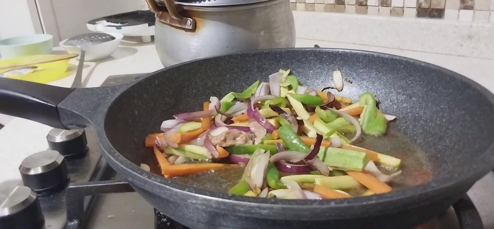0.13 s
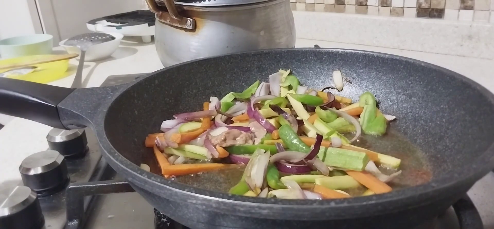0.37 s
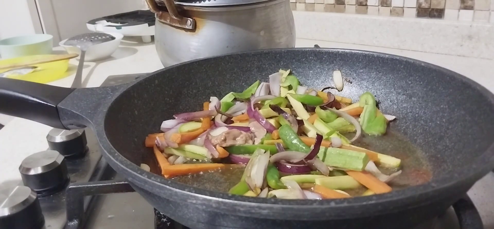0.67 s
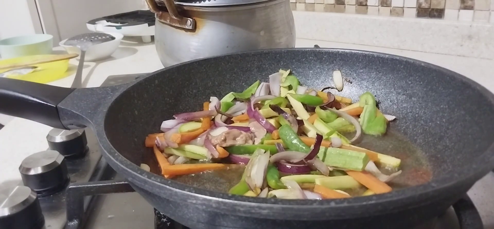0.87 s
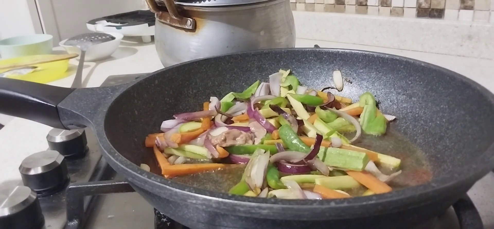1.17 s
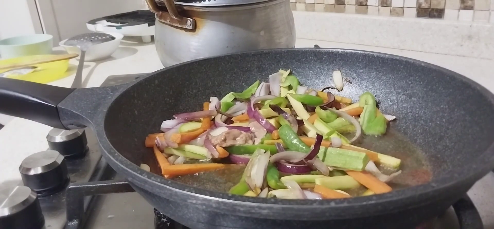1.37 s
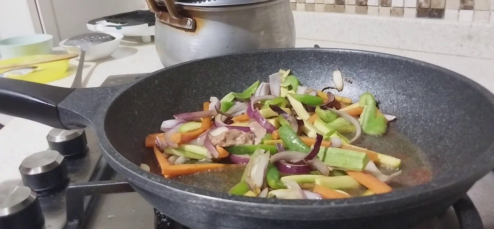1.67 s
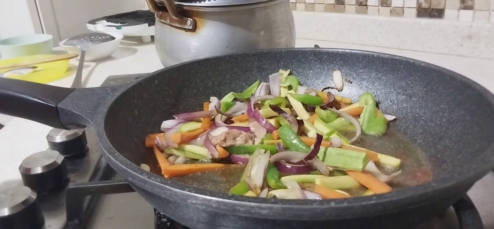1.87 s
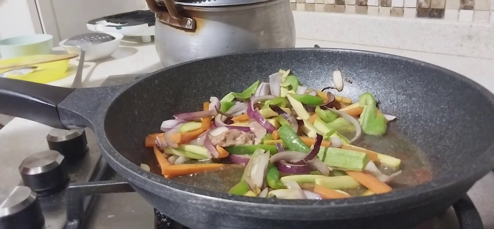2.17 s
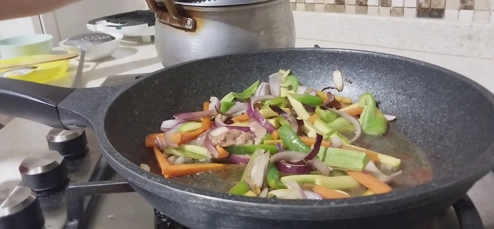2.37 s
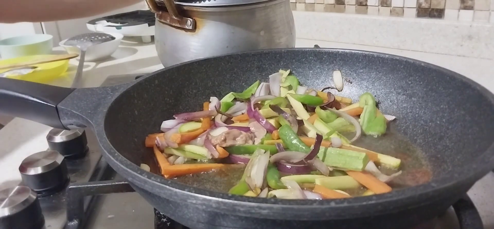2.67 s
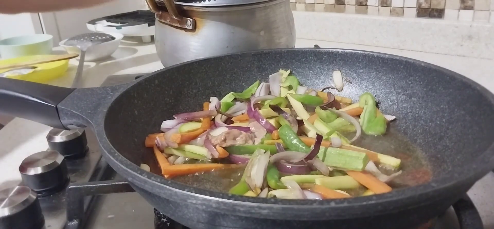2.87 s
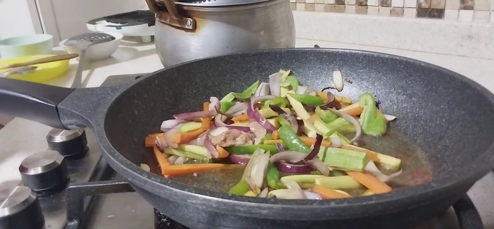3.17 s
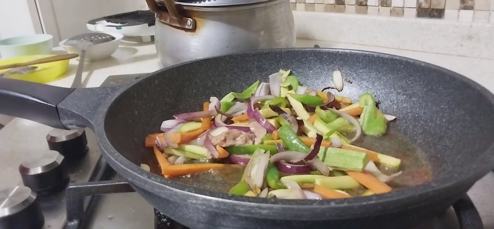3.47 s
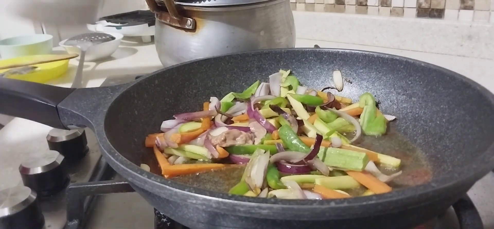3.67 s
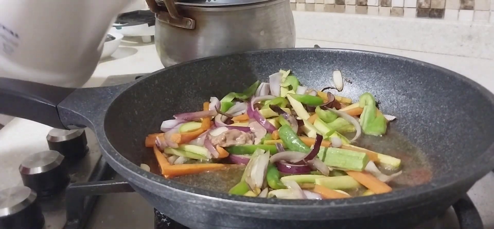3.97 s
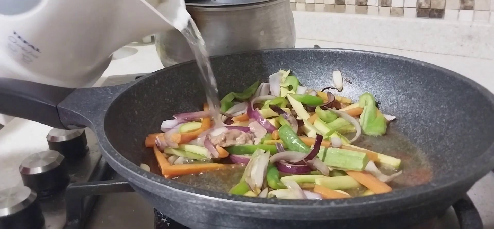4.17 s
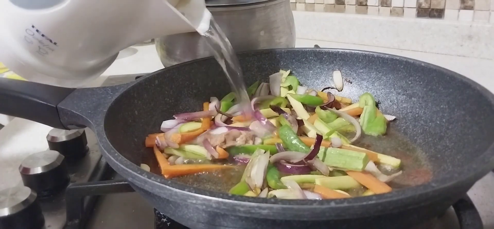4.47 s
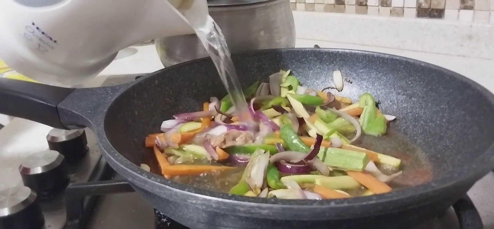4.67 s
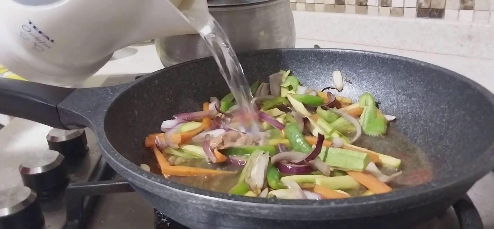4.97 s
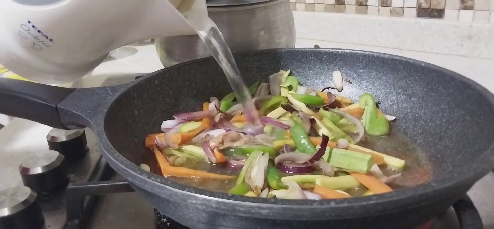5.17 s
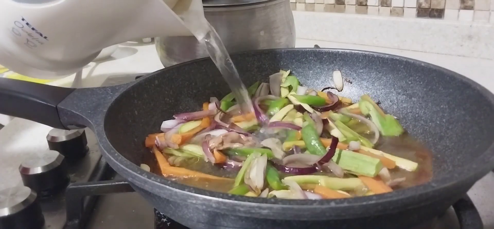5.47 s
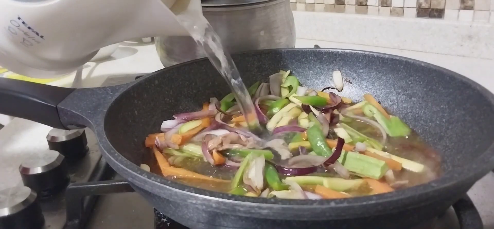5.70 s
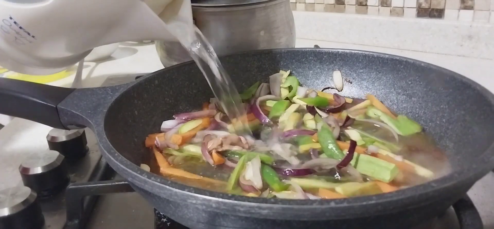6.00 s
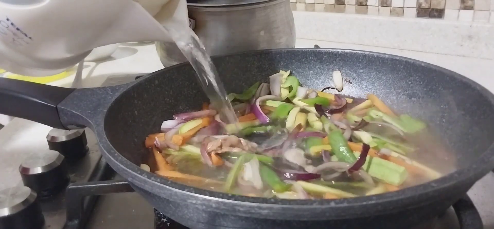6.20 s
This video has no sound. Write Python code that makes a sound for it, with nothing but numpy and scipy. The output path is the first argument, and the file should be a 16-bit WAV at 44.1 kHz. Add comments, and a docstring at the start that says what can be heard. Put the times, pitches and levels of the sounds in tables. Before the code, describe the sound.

Crackling frying over a low gas flame, several heavy rattling thumps, a finger rub on the microphone, then a duller sizzle rising into bubbling.

```python
"""Water poured into a frying pan

Vegetables sizzle over a gas flame near a hand-held camera in a small kitchen: bursting bubbles over hissing steam.
Five dull knocks ring the counter's modes and rattle what lies on it; a utensil clacks, bounces and slides; oil spits.
Water is poured in and its longer-ringing bubbles come up; a finger judders over the left microphone.
The grip shifts: the sizzle drops abruptly, the left treble opens and the right one dulls.
Then the pan boils up, with a faint whistle of steam."""
import sys
import numpy as np
from scipy import signal
from scipy.fft import rfft, irfft
from scipy.io import wavfile
from scipy.ndimage import map_coordinates

SR = 44100
rng = np.random.default_rng(int(sys.argv[2]) if len(sys.argv) > 2 else 0)


def write(x):
    x = np.atleast_2d(x).T
    wavfile.write(sys.argv[1], SR, np.round(np.clip(x, -1, 1) * 32767).astype(np.int16))


N = 279594
TIME = np.arange(N) / SR  # seconds

# Gas flame over time. Each row: time in seconds, level in dB.
FLAME = [(0, -38.5), (1.1, -40), (3.1, -46.5), (4.3, -52.5), (4.85, -54), (5.25, -65), (6.34, -58.5)]
# Spectrum of the flame's roar. Each row: frequency in Hz, density in dB per Hz.
ROAR = [(25, -22), (55, -6.5), (100, 4.5), (160, -6), (245, 5), (370, -19.5), (520, -5), (900, -18),
        (3000, -50)]
# The hollow of the pan: it rings at one pitch when open, at another with the jug held over it.
HOLLOW_START_DB, HOLLOW_DB_PER_FLAME_DB = -41, 0.37
HOLLOW_OPEN_HZ, HOLLOW_COVERED_HZ = 603, 714
JUG_OVER_S, JUG_MOVE_S = 3.73, 0.23

# Skin that sticks and slips. Each row: start in seconds, length in seconds, level in dB, judder in Hz,
# share by which the pitch sags at the end.
SLIPS = [(4.519, 0.058, -18, 239, 0.064), (4.572, 0.078, -13, 230, 0.075), (4.576, 0.17, -17, 140, 0.017),
         (4.638, 0.065, -35, 637, 0), (4.73, 0.038, -15, 232, 0.08), (4.735, 0.082, -24, 139.3, 0),
         (4.778, 0.048, -35, 635, 0.32), (4.798, 0.024, -15.5, 233, 0.08)]
SLIP_OVERTONE, SLIP_OVERTONE_DB = 1.6, -20.5  # the skin's second resonance: ratio to the first, level against it
# Spectrum of the finger's scuff. Each row: frequency in Hz, density in dB per Hz.
SCUFF = [(30, -18), (100, 3.0), (350, -10.5), (480, -25), (640, -18), (900, -34), (6000, -43)]
RUB_START_S, RUB_RISE_S = 4.50, 0.043
GRIP_SHIFT_S = 4.82  # the rubbing stops as the grip shifts

# Soft bumps on the camera body. Each row: start in seconds, level in dB, pitch in Hz, t60 in seconds.
BUMPS = [(0.108, -21, 194, 0.065), (0.474, -21, 225, 0.05), (0.576, -27, 190, 0.089),
         (2.975, -32.5, 106, 0.43), (4.806, -14, 125, 0.042), (5.535, -26.5, 64, 0.46),
         (5.63, -32, 80, 0.17), (5.74, -45, 60, .3)]
# Spectrum of the diffuse tail after a bump. Each row: frequency in Hz, density in dB per Hz.
BUMP_TAIL = [(30, -3), (70, -3.0), (230, -3), (400, -14), (3000, -26)]

# A utensil set down and bouncing. Each row: start in seconds, level in dB.
CLUNKS = [(2.860, -15.5), (2.877, -27), (2.933, -27)]
# Modes of the utensil. Each row: frequency in Hz, level in dB, t60 in seconds.
UTENSIL = [(544, -3.5, 0.072), (610, -1, 0.1), (787, -9.5, .1), (938, -12, 0.093), (1476, -9.5, 0.063),
           (1970, -10, 0.06), (2590, -14, .05)]
# Spectrum of the clack's echo. Each row: frequency in Hz, density in dB per Hz.
CLACK_ECHO = [(250, -26), (480, 0), (600, -1.0), (750, -12), (1500, -9), (5000, -19)]
SLIDE_S, SLIDE_LENGTH_S, SLIDE_DB, SLIDE_HZ = 3, 0.23, -37, 545

# Loud spits and ticks of oil. Each row: start in seconds, level in dB.
TICKS = [(2.018, -23.5), (2.858, -27.5), (3.757, -33)]
# Spectrum of a spit. Each row: frequency in Hz, density in dB per Hz.
SPIT = [(400, -10), (1100, 1), (5000, 3), (10000, -1), (15000, -14)]
SNAP_S, SNAP_DB = 0.0007, 12  # the burst itself: decay time, level over its reflections

# Knocks on the counter, the last one a tumble of four contacts. Each row: start in seconds, force in dB,
# thud against it in dB, rattle against it in dB, factor on the decay times.
KNOCKS = [(1.2083, 2, -2, -0.2, 0.99), (1.536, 0.5, 1.5, -2.5, 1.2), (1.800, -3, 2, -1.5, 1.17),
          (2.138, -1.5, 2.5, -4, 1.12), (3.147, -2.5, -6, 6.5, 1.4), (3.165, 0.5, -5, 0.5, 1.04),
          (3.1814, 1, -10, -3, 0.98), (3.2004, -7.5, -1, -1.5, 0.9)]
# The panel under the blow. Each row: frequency in Hz, level in dB, t60 in seconds.
THUD = [(44.6, -17, 0.43), (54.1, -11.5, 0.27), (83.7, -4.5, 0.19), (107.3, 1, 0.22)]
# Modes of counter and cupboard. Each row: frequency in Hz, level in dB, t60 in seconds before the knock's factor.
COUNTER = [(98.5, 0, 0.35), (152, -1.5, 0.19), (184.2, -8, 0.36), (219.5, -9, 0.27), (242.8, -10.5, 0.78),
           (268.2, -4.5, 0.4), (302, -7.5, 0.29), (327, -16, 0.47), (342, -9.5, 0.38), (460, -15, 0.31),
           (493, -11, 0.17), (556, -22, 0.24), (713, -21, 0.35)]
MODE_SPREAD_DB = 1.1  # each blow lands elsewhere and favours other modes
# The room's answer to a knock. Each row: frequency in Hz, density in dB per Hz.
BOOM = [(25, -30), (50, 2.5), (105, -4.5), (165, -1.5), (260, 2.5), (340, -4), (400, -16.5), (490, -7),
        (560, -29), (1500, -48)]
THUD_BELOW_HZ = 130  # a heavier thud also deepens the room's answer below this
# Loose things on the counter. Each row: frequency in Hz, density in dB per Hz.
RATTLE = [(150, -13), (450, 7), (800, 1), (1100, 1), (1500, -2.5), (2200, -3.5), (4400, -2), (6500, -13.5),
          (9000, -13.5), (15000, -18)]
CHATTER_PER_S, CHATTER_FADE_S = 450, 0.039  # hard contacts per second, decay time
# Decay of the kitchen's reflections. Each row: frequency in Hz, t60 in seconds before each sound's own factor.
KITCHEN = [(60, 0.67), (250, 0.55), (600, 0.63), (2000, 0.45), (12000, 0.12)]

# Steam that sings through a gap in the vegetables; its pitch sinks as the water rises.
SINGING_S, SINGING_LENGTH_S, SINGING_DB = 5.98, 0.3, -42
SINGING_START_HZ, SINGING_END_HZ, SINGING_WIDTH_HZ = 2950, 2680, 150

# Frying, used until the drop. Each row: time in seconds, sizzle in dB before a fixed lift.
HEAT = [(0.0, -33), (0.97, -33), (1.29, -38), (2.12, -39.5), (3.1, -38), (3.31, -41.5), (3.6, -40.5),
        (4.4, -41.5), (4.7, -40)]
HEAT_LIFT_DB = 2
# Spectrum of the bursting bubbles. Each row: frequency in Hz, density in dB per Hz.
SIZZLE = [(100, -29), (350, -5.5), (800, -2.5), (1300, -1), (1900, -0.5), (2400, -2), (3200, -0.5),
          (4700, 2.5), (6200, 0), (10000, -2.5), (12200, -4.5), (15500, -7)]
# Spectrum of the ringing water bubbles. Each row: frequency in Hz, density in dB per Hz.
BOIL = [(1400, -22), (1900, 1.5), (2200, -8.5), (2700, -2.5), (3400, -11), (4400, 3), (5600, 1.5),
        (6600, 2.5)]
# Flare-ups as juice or water meets hot metal. Each row: peak time in seconds, dB above the sizzle.
FLARES = [(0.90, 1.5), (1.10, 2), (4.522, 4.5), (4.70, 3.5), (4.78, 1), (5.40, 1.5), (5.57, 2), (5.70, 0.5),
          (6.07, 1), (6.145, 1.5)]
FLARE_RISE_S, FLARE_FADE_S = 0.019, 0.04
FLARE_FIZZ = 0.35  # flares are bright: extra dB of finest bubbles per dB of flare
POUR_S, WET_RISE_S = 4.33, 0.29  # the water lands, its bubbles come in
DROP_S, DROP_LENGTH_S = 4.81, 0.014  # the sizzle drops abruptly as the grip shifts
BOIL_START_S, BOIL_RISE_S = 5.29, 1
PLIPS_DB = -5.5  # a few large bubbles against the small ones

# Microphone colour. Each row: frequency in Hz, left in dB, right in dB, left in dB after the grip shifts,
# right in dB after it.
PORTS = [(386, 0.5, 1, -1, -2.5), (1840, 0, -1, 1.5, 1), (6160, -3.5, -0.5, -1.5, -0.5),
         (6800, -6.5, 2, -3, -2), (7600, -32, 3.5, -12, -5.5), (8040, -42, -3, -35, -14),
         (8760, -27, -6, -13, -10.5), (10350, -20.5, 1, -7.5, -3), (12150, -9.5, 3, 1, 3.5),
         (15500, -9, 0.5, 1, 3.5)]
# Likeness of the two microphones. Each row: frequency in Hz, left-right coherence from 0 to 1.
LIKENESS = [(50, 0.83), (120, 0.53), (250, 0.62), (500, 0.74), (1000, 0)]
EDGE_HZ = 15650  # upper band limit


def amp(db):
    """Decibels to gain."""
    return 10 ** (np.asarray(db) / 20)


def unit(x):
    """Scales to rms 1."""
    return x / np.sqrt(np.mean(x ** 2) + 1e-20)


def read(points, hz):
    """Reads a table along log frequency."""
    f, value = np.transpose(points)
    return np.interp(np.log(hz + 1), np.log(f + 1), value)


def follow(rows):
    """One curve from (seconds, value) rows, joined by straight lines."""
    s, value = np.transpose(rows)
    return np.interp(TIME, s, value)


def ramp(start_s, length_s):
    """Goes steadily from 0 to 1, then stays."""
    return np.clip((TIME - start_s) / length_s, 0, 1)


def arch(start_s, length_s):
    """Swells from 0 to 1 and back."""
    return np.sin(np.pi * ramp(start_s, length_s))


def glide(start_s, length_s, first, last):
    """Moves steadily from one value to another."""
    return np.interp(ramp(start_s, length_s), [0, 1], [first, last])


def stages(frying, dropped, boiling):
    """A value through three stages: the pan fries, drops abruptly as the grip shifts, then comes to the boil."""
    drop = (dropped - frying) * ramp(DROP_S, DROP_LENGTH_S)
    boil = (boiling - dropped) * ramp(BOIL_START_S, BOIL_RISE_S)
    return frying + drop + boil


def add(mix, s, sound):
    """Mixes a sound in at time s."""
    part = mix[:, round(s * SR):][:, :sound.shape[-1]]
    part += sound[..., :part.shape[1]]


def colour(x, spectrum):
    """Filters by a (Hz, dB) table."""
    size = x.shape[-1]
    gain = amp(read(spectrum, np.fft.rfftfreq(size, 1 / SR)))
    return irfft(rfft(x) * gain, size)


def air(size):
    """White noise at two close microphones: alike in the bass, unrelated in the treble."""
    a, b = rfft(rng.standard_normal((2, size)))
    same = np.clip(read(LIKENESS, np.fft.rfftfreq(size, 1 / SR)), 0, 1)
    return irfft(np.array([a, same * a + np.sqrt(1 - same ** 2) * b]), size)


def wander(rate):
    """Smooth random drift of rms 1 with rate new values a second."""
    values = rng.standard_normal(4096)
    return unit(map_coordinates(values, [TIME * rate], order=2, mode="wrap"))


def resonate(x, hz, width):
    """A resonance that follows the curve hz: shift it down to 0 Hz, smooth, shift back."""
    turn = np.exp(2j * np.pi * np.cumsum(hz) / SR)
    r = np.exp(-np.pi * width / SR)
    return (turn * signal.lfilter([(1 - r) ** 2], [1, -2 * r, r * r], x / turn)).real


def ring(modes, stretch=1):
    """Dying sines of a struck object."""
    t = TIME[:SR]
    return sum(amp(db - 60 * t / (t60 * stretch)) * np.sin(2 * np.pi * hz * t) for hz, db, t60 in modes)


def onset(rise_s):
    """A soft start: 0 to 1 with the given time constant."""
    return 1 - np.exp(-TIME[:SR] / rise_s)


def tail(spectrum, stretch, rise_s):
    """Dense kitchen reflections that build up and die, the treble first."""
    hz, t, z = signal.stft(unit(colour(air(SR), spectrum)), SR, nperseg=512)
    t60 = stretch * read(KITCHEN, hz)[:, None]
    decaying = signal.istft(z * amp(-60 * t / t60), SR)[1][:, :SR]
    return decaying * onset(rise_s)


def crackle(per_s, spread_db, pop_s, wet, top_hz):
    """Tiny bubbles burst, each a brief ring at its own pitch, size and side; the walls smear them."""
    t = np.arange(0, 4 * pop_s, 1 / SR)
    when, size, side, lag, pitch, sign = rng.random((int(per_s * TIME[-1]), 6)).T[..., None]
    # many small bursts, few large ones, of either polarity
    height = amp(spread_db * np.minimum(-np.log(1 - size), 5)) * np.sign(sign - .5)
    hz = 900 + pitch * (top_hz - 900)
    rings = height * np.exp(-t / pop_s) * np.sin(2 * np.pi * hz * t)
    at = (when * N).astype(int) + np.arange(len(t))
    # the left arrives up to 6 samples before or after the right
    ports = [(at + (lag * 12).astype(int), side), (at + 6, 1 - side)]
    out = np.array([np.bincount(i.ravel(), (rings * np.sqrt(share)).ravel(), N)[:N] for i, share in ports])
    walls = tail([(100, 0), (15000, 0)], stretch=0.26, rise_s=0.0031)
    smeared = signal.oaconvolve(out, walls, axes=1)[:, :N]
    return unit(unit(out) + wet * unit(smeared))


def stove():
    """The flame is low fluttering noise; the hollow of the pan is a noise resonance that partly follows its level."""
    level_db = follow(FLAME)
    flutter_db = 2 * wander(18)
    left_over_right_db = glide(GRIP_SHIFT_S, .01, 10, -18.5)
    sides_db = np.array([left_over_right_db, -left_over_right_db]) / 2
    flame = unit(colour(air(N), ROAR)) * amp(level_db + sides_db + flutter_db)

    hz = glide(JUG_OVER_S, JUG_MOVE_S, HOLLOW_OPEN_HZ, HOLLOW_COVERED_HZ)
    flame_change_db = level_db - level_db[0]
    hollow_db = HOLLOW_START_DB + HOLLOW_DB_PER_FLAME_DB * flame_change_db + .5 * flutter_db
    hollow = unit(resonate(air(N), hz, width=266)) * amp(hollow_db) * amp([[-2], [2.5]])
    return flame + hollow


def finger_rub():
    """Skin scuffs across the left port as low noise; each stick-slip is a juddering swell of unsteady pitch."""
    scuff = unit(colour(rng.standard_normal((2, N)), SCUFF))
    sliding = ramp(RUB_START_S, RUB_RISE_S) * (1 - ramp(GRIP_SHIFT_S, 0.0055))
    out = scuff * sliding * amp([[-27], [-36]])
    unsteady = 1 + 0.04 * wander(90)
    for s, length, db, hz, sag in SLIPS:
        progress = np.arange(0, 1, 1 / (length * SR))
        swell = np.sin(np.pi * progress)
        pitch = hz * (1 - sag * progress ** 3) * unsteady[round(s * SR):][:len(swell)]
        phase = 2 * np.pi * np.cumsum(pitch) / SR
        judder = np.sin(phase) + amp(SLIP_OVERTONE_DB) * np.sin(SLIP_OVERTONE * phase)
        add(out, s, amp(db) * swell * judder * amp([[0], [-22]]))
    return out


def body_bumps():
    """Soft bumps on the camera body: one low dying sine each, with a diffuse tail."""
    out = np.zeros((2, N))
    for s, db, hz, t60 in BUMPS:
        push = ring([(hz, 0, t60)]) * onset(.006)
        diffuse = amp(-4.0) * tail(BUMP_TAIL, stretch=t60 * 2, rise_s=0.0021)
        add(out, s, amp(db) * (push + diffuse))
    return out


def utensil():
    """A utensil clacks and bounces, ringing its modes into the room, then slides as narrow noise."""
    out = np.zeros((2, N))
    note = ring(UTENSIL) * onset(0.0017) * amp([[-1], [2]])
    for s, db in CLUNKS:
        echo = tail(CLACK_ECHO, stretch=1.0, rise_s=0.0023)
        add(out, s, amp(db) * (note + amp(-11.0) * echo))
    slide = unit(resonate(air(N), np.full(N, SLIDE_HZ), width=83))
    return out + slide * arch(SLIDE_S, SLIDE_LENGTH_S) * amp(SLIDE_DB)


def oil_spits():
    """Large drops of oil spit with a sharp snap of noise that the walls throw back."""
    out = np.zeros((2, N))
    for s, db in TICKS:
        snap = unit(colour(air(SR), SPIT)) * np.exp(-TIME[:SR] / SNAP_S) * amp(SNAP_DB)
        walls = tail(SPIT, stretch=0.37, rise_s=0.00077)
        add(out, s, amp(db) * (snap + walls) * amp([[-1.5], [1.5]]))
    return out


def chatter():
    """Loose things jump and land again and again, each contact a hard tick."""
    contacts = (rng.random((2, SR)) < CHATTER_PER_S / SR) * rng.uniform(-0.85, 1, (2, SR))
    return unit(colour(contacts * np.exp(-TIME[:SR] / CHATTER_FADE_S), RATTLE))


def knocks():
    """Each blow thuds, swings the counter's modes, fills the room with a boom and rattles what lies on top."""
    out = np.zeros((2, N))
    swing = onset(0.0062)  # heavy panels take a moment to get moving
    for s, force_db, thud_db, rattle_db, stretch in KNOCKS:
        modes = [(hz, db + MODE_SPREAD_DB * rng.standard_normal(), t60) for hz, db, t60 in COUNTER]
        thud = ring(THUD) * amp(thud_db - 10.5)
        counter = ring(modes, stretch) * amp(-13.5)
        answer = [(hz, db + thud_db * (hz < THUD_BELOW_HZ)) for hz, db in BOOM]
        boom = tail(answer, stretch * 0.9, rise_s=0.0047) * amp(-17.0)
        rattle = tail(RATTLE, stretch, rise_s=0.003) * amp(-22.5) + chatter() * amp(-45.5)
        blow = swing * (thud + counter) + boom + rattle * amp(rattle_db)
        add(out, s, amp(force_db) * blow)
    return out * amp([[-1.3], [1.2]])


def steam():
    """A faint, rippling whistle as the water comes to the boil: noise through a narrow, sinking resonance."""
    hz = glide(SINGING_S, SINGING_LENGTH_S, SINGING_START_HZ, SINGING_END_HZ)
    whistle = unit(resonate(air(N), hz, SINGING_WIDTH_HZ))
    return whistle * arch(SINGING_S, SINGING_LENGTH_S) * amp(SINGING_DB)


def water_bubbles():
    """Bubbles in water ring longer than bursts in oil: many small ones and a few large plips, in clumps."""
    small = unit(colour(crackle(per_s=1300, spread_db=2.5, pop_s=0.0043, wet=0.87, top_hz=6590), BOIL))
    large = unit(colour(crackle(per_s=130, spread_db=3.0, pop_s=0.0089, wet=.5, top_hz=6070), BOIL))
    clumps_db = 2.0 * wander(26)
    level_db = stages(frying=-3, dropped=-7, boiling=5) + clumps_db  # against the sizzle
    return (small + amp(PLIPS_DB) * large) * ramp(POUR_S, WET_RISE_S) * amp(level_db)


def sizzle():
    """Bursting bubbles over a hiss of steam, sputtering as juice or water meets hot metal; later the water boils."""
    flares_db = 0
    for s, db in FLARES:
        distance = np.maximum((s - TIME) / FLARE_RISE_S, (TIME - s) / FLARE_FADE_S)
        flares_db = flares_db + db * np.exp(-distance)
    level_db = stages(frying=follow(HEAT) + HEAT_LIFT_DB, dropped=-42, boiling=-35) + flares_db

    pops = crackle(per_s=4200, spread_db=2.8, pop_s=.00025, wet=.6, top_hz=EDGE_HZ)
    hiss = amp(3.5) * air(N)
    sound = colour(pops + hiss, SIZZLE)
    # the finest bubbles, in the top treble, move apart from the rest
    body = colour(sound, [(7500, 0), (9500, -60)])
    fizz_db = stages(frying=2.08, dropped=-3.5, boiling=2.5) + FLARE_FIZZ * flares_db + .5 * wander(45)
    fizz = unit(sound - body) * amp(fizz_db)
    body = unit(body) * amp(4.5 + 0.47 * wander(45))
    return (body + fizz + water_bubbles()) * amp(level_db + 0.5 * wander(24.01))


def scene():
    """Everything at the two microphones."""
    background = stove() + finger_rub() + body_bumps()
    return background + utensil() + oil_spits() + knocks() + steam() + sizzle()


def record(dry):
    """Port colours with treble notches that change with the grip, then a low cut, full scale and the band limit."""
    hz, *gains_db = np.array(PORTS).T
    left, right, left_after, right_after = [np.column_stack([hz, db]) for db in gains_db]
    before = np.array([colour(dry[0], left), colour(dry[1], right)])
    after = np.array([colour(dry[0], left_after), colour(dry[1], right_after)])
    ports = before + ramp(GRIP_SHIFT_S, .01) * (after - before)

    low_cut = signal.butter(5, 38, "high", fs=SR)
    heard = np.clip(signal.lfilter(*low_cut, ports), -1, 1)
    band_limit = signal.firwin(511, EDGE_HZ, window=("kaiser", 9), fs=SR)
    return signal.oaconvolve(heard, band_limit[None], "same")


dry = scene()
out = record(dry)
write(out)
```